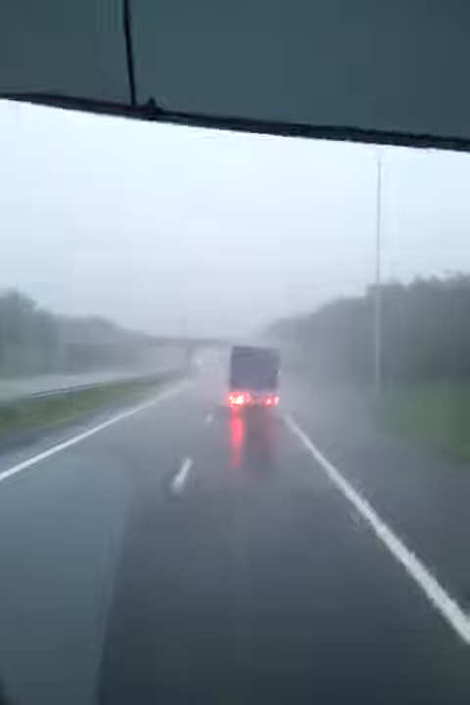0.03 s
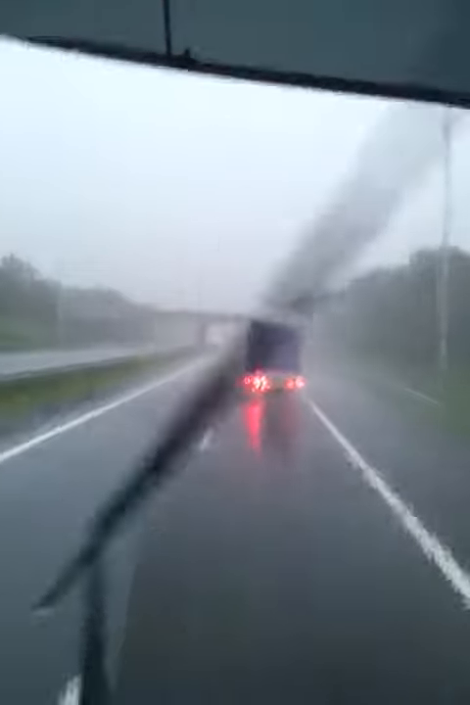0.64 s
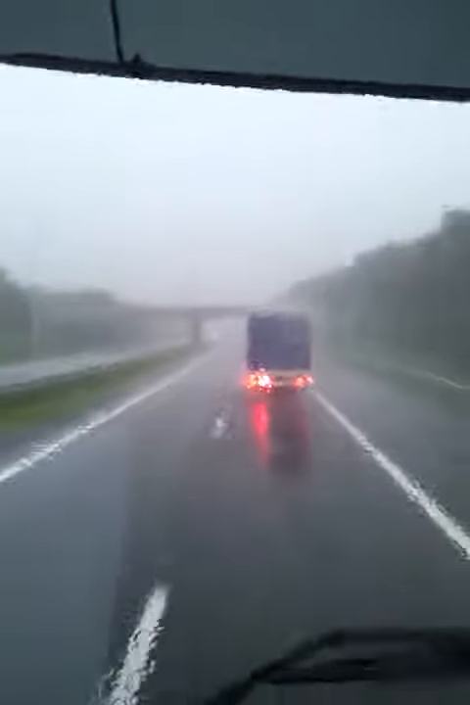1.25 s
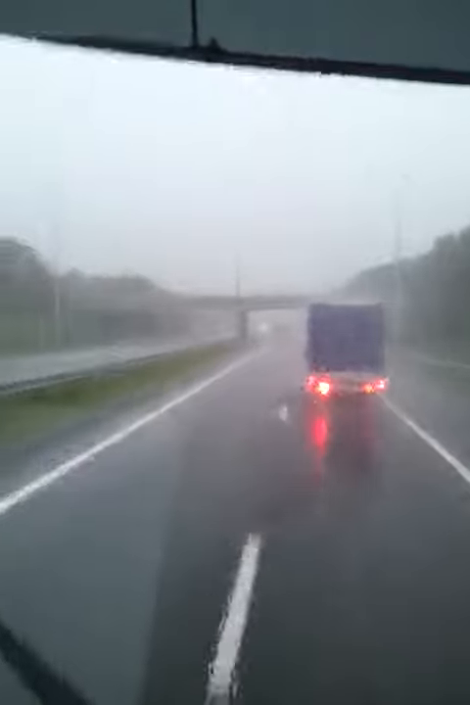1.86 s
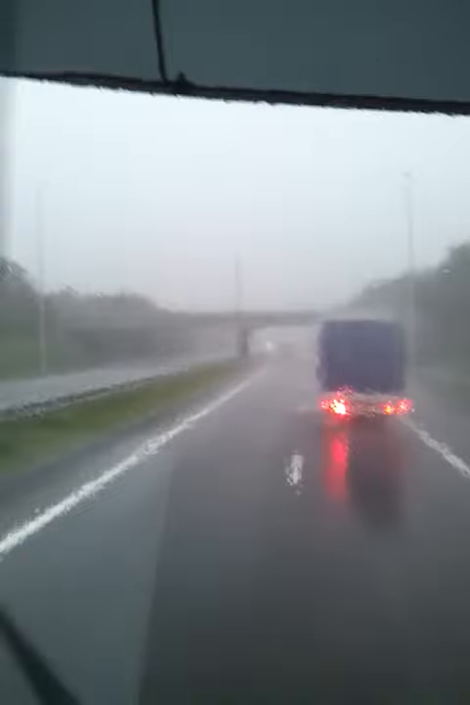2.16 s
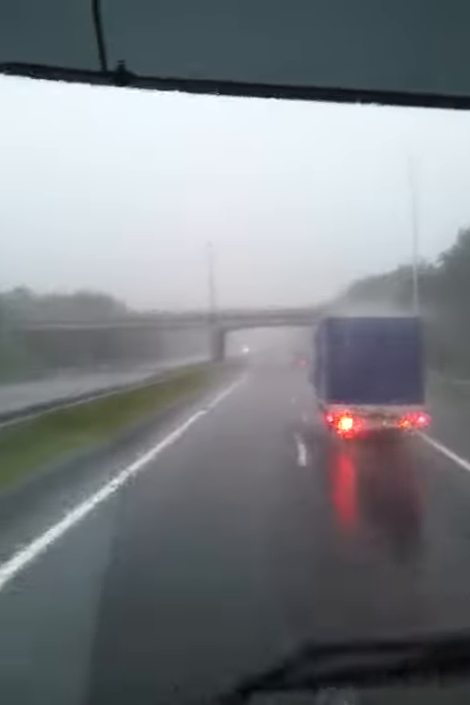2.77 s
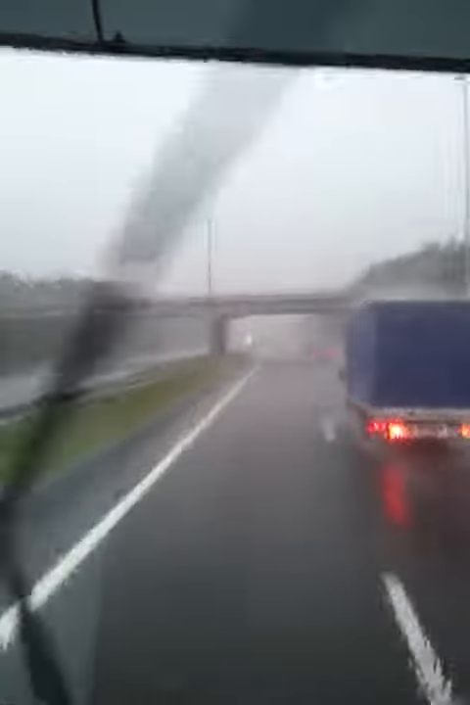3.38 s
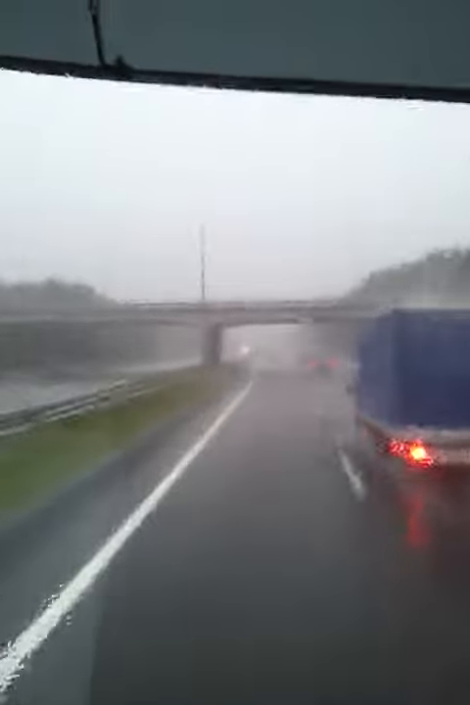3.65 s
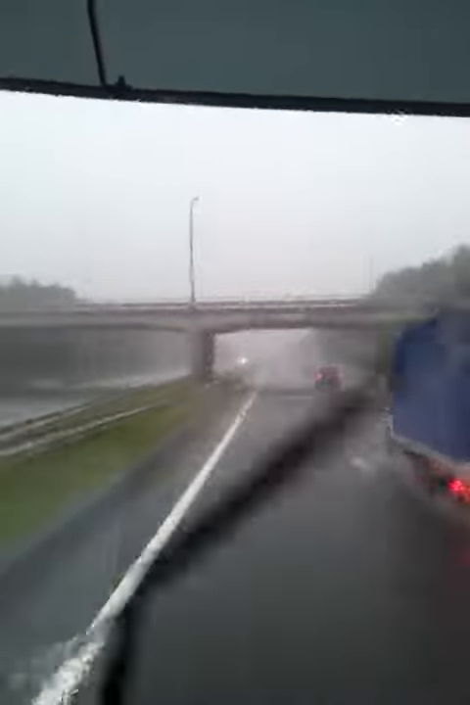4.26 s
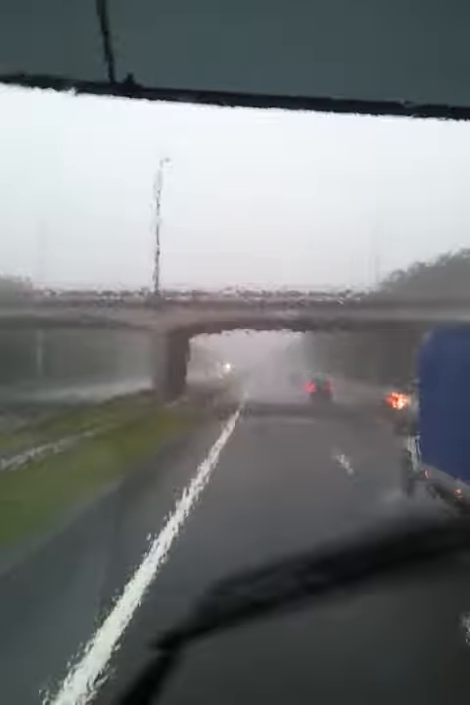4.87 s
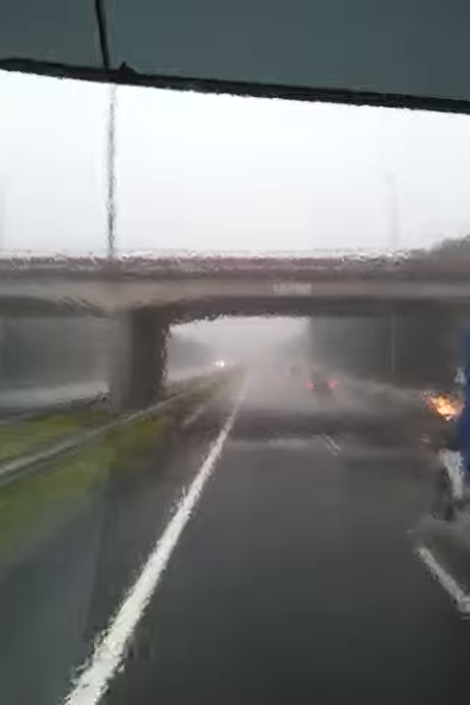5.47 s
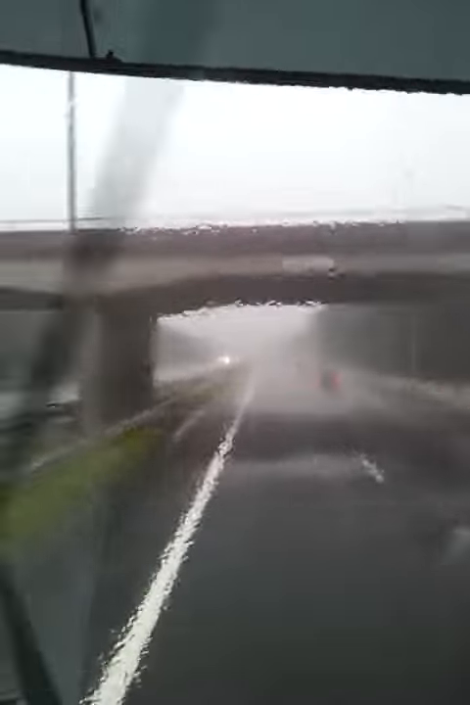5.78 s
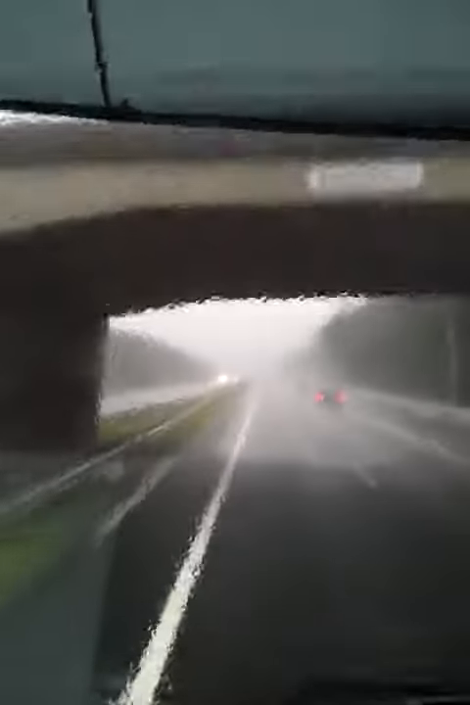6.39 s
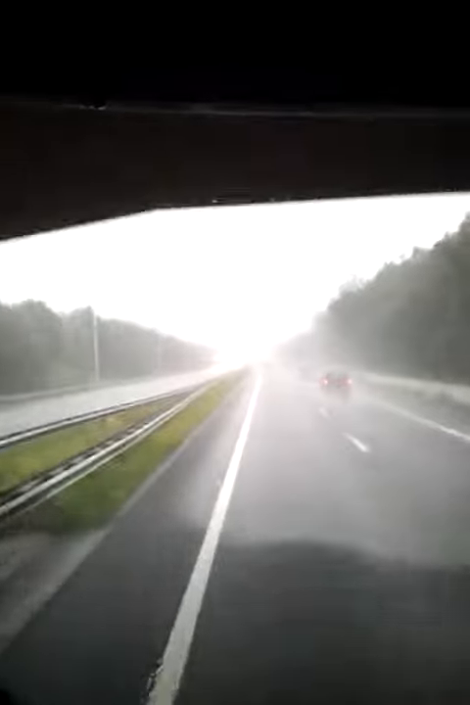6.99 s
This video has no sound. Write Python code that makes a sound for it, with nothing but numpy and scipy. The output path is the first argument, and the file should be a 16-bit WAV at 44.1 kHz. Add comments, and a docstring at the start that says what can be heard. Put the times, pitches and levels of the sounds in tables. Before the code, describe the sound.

Heard from inside a moving car, heavy rain drums and hisses on the windscreen and roof over tyre roar and low body rumble. A wiper rubs briefly on the glass, and the engine drones, then eases off. A lorry's low throb and tyre growl build as it is overtaken, while water slaps the windscreen now and then. At the end the rain cuts out under a bridge, leaving the road noise and the lorry.

```python
"""Motorway downpour from inside a car

Rain drums on the windscreen and roof, a dense train of random impacts, over tyre roar and body rumble.
The engine drones at multiples of its crank rate, then eases off, and the gears whine faintly. A lorry
throbs with each turn of its wheels as it is overtaken, and a wiper rubs on the glass and knocks once.
At the end a bridge shelters the windscreen, then the roof, and the drumming stops. One cabin microphone."""
import sys
import numpy as np
from scipy import signal
from scipy.fft import rfft, irfft, next_fast_len
from scipy.io import wavfile
from scipy.ndimage import map_coordinates

SR = 44100
rng = np.random.default_rng(int(sys.argv[2]) if len(sys.argv) > 2 else 0)


def int16_out(signal):
    """Quantize to a 16-bit WAV file."""
    q = np.round(np.clip(np.atleast_2d(signal).T, -1, 1) * 32767)
    wavfile.write(sys.argv[1], SR, q.astype(np.int16))


N = 310023

# resonances and dips of glass, roof and cabin air: (centre [Hz], width [Hz], gain [dB])
CABIN_RESONANCES = [(255, 26, 5), (264, 32, 0), (334, 25, 3), (416, 30, 4), (490, 22, 2.5), (531, 15, 4),
                    (820, 24, 0.5), (940, 31, -4), (1060, 74, 2), (1180, 50, -1.5), (1547, 90, -1.4),
                    (1800, 200, 0.5), (2380, 220, 0.7)]
# the microphone's treble roll-off: (frequency [Hz], gain [dB])
MIC_RESPONSE = [(6500, 0.5), (7100, -0.5), (7500, -5.5), (7900, -15), (8400, -16.5), (8800, -24.5),
                (9100, -34.5)]

# rumble of the body on the road: (time [s], relative level [dB])
RUMBLE_LEVEL = [(.8, -31), (1.05, -31.5), (1.85, -34), (2.85, -33.5), (3.55, -35), (4.9, -33), (5.8, -36),
                (6.5, -33.5)]
# spectrum of that rumble: (frequency [Hz], relative density [dB])
RUMBLE_SPECTRUM = [(8, -26.5), (20, -1.5), (33, 0), (50, -2.5), (75, 1), (115, 0), (150, 2.5), (185, -13.5),
                   (260, -32.5), (500, -47)]
# tyre roar on wet asphalt: (frequency [Hz], relative density [dB])
ROAR_SPECTRUM = [(100, -14.5), (170, -5), (250, -2), (380, -4), (500, -1), (650, -5), (1000, -10),
                 (1300, -17.5), (2500, -26), (5000, -34), (9000, -46.5)]
# tyres plough through standing water: (middle [s], length [s], level [dB])
PUDDLE_SWELLS = [(1.103, .35, -34), (2.246, 0.21, -32), (4.518, 0.23, -32.5), (5.176, 0.22, -27),
                 (6.2, 0.25, -31.5), (6.709, .15, -31.5)]
# its hollow rush in the wheel arches: (frequency [Hz], relative density [dB])
ARCH_SPECTRUM = [(150, -17), (330, -7), (480, 0.5), (600, -2), (800, -9), (1500, -18.5), (5000, -47.5)]

# the engine pulls, then eases off: (time [s], level [dB])
ENGINE_LEVEL = [(1.0, -33), (1.6, -28.5), (2.2, -25), (2.8, -29), (3.25, -25), (3.42, -36), (7.03, -41)]
# engine speed: (time [s], crank rate [turns/s])
CRANK_RATE = [(1.0, 49.7), (1.31, 49.1), (1.71, 47.1), (2.77, 46.0), (2.96, 46.0), (3.4, 47.5)]
# engine partials: (order [multiple of crank rate], relative level [dB])
ENGINE_PARTIALS = [(1, -8), (1.5, -7.5), (2, 0), (3, -3.5), (3.5, -5)]

# the lorry draws alongside: (time [s], relative level [dB])
LORRY_LEVEL = [(3.4, -60.5), (4.0, -40), (4.8, -33.5), (5.3, -26.5), (5.8, -25.5), (6.55, -26.5),
               (7.03, -25)]
# its wheels gather a little speed: (time [s], rate [turns/s])
LORRY_WHEEL_RATE = [(4.8, 9.33), (5.4, 9.44), (5.8, 9.59), (7.03, 9.77)]
# one throb, falling in pitch: (share of cycle [0-1], nominal pitch [Hz], relative level [dB])
THROB_SHAPE = [(0, 142, -15.5), (.15, 126, -5.5), (.35, 115, 1.5), (.55, 103, -6), (.75, 94, -3),
               (1, 84, -7)]
# growl of the lorry's tyres: (frequency [Hz], relative density [dB])
GROWL_SPECTRUM = [(50, -28), (85, -2.5), (125, 4), (165, -12.5), (192, 0), (220, -7.5), (255, -3),
                  (300, -14), (480, -6.5), (700, -23.5), (2000, -40)]

# wiper rubs on the glass: (time [s], t60 [s], starting pitch [Hz], level [dB])
WIPER_RUBS = [(1.095, 0.24, 630, -23), (1.3, 1.2, 550, -29.5)]
# dull ring of the wiper's knock: (frequency [Hz], relative level [dB])
WIPER_KNOCK_MODES = [(700, -4), (930, 4), (1080, -1)]
# water slaps the windscreen: (time [s], relative level [dB], t60 [s])
WINDSCREEN_SPLATS = [(1.104, -15, 0.082), (1.235, -12, 0.017), (1.476, -18, 0.028), (2.008, -25, 0.016),
                     (3.088, -19.5, 0.21), (4.022, -14, 0.02), (6.24, -14.5, 0.094), (6.281, -19, 0.29),
                     (6.595, -27, 0.32)]
# the bridge covers windscreen, then roof: (middle [s], time to cover [s], weight in the rain [dB])
SHELTERED_PANELS = [(6.79, 0.16, 2), (6.944, 0.037, -11.5)]
# how hard it rains on the car: (time [s], relative level [dB])
RAIN_LEVEL = [(1.55, -24), (1.85, -22.5), (2.38, -22), (2.48, -24), (2.9, -25.5), (3.02, -23), (3.3, -23.3),
              (3.95, -21), (4.85, -22), (5.2, -21.2), (5.6, -23), (6.05, -19.5), (6.45, -22), (6.6, -19.5)]
# the rain's sound briefly drops out at 0.924 s, just after the microphone starts;
# the other rows are denser sheets and lulls: (middle [s], length [s], level change [dB])
RAIN_SWELLS_AND_DIPS = [(0.82, 0.045, 1.5), (0.924, 0.06, -10), (0.98, 0.031, 1), (1.196, 0.14, 4),
                        (1.41, 0.1, -4.5), (1.657, 0.044, -2.5), (2.473, 0.064, -3), (2.92, 0.045, -1.5),
                        (3.11, .08, 2.9), (3.552, 0.11, -1.5), (3.738, 0.063, 1.5), (3.852, .05, -1.8),
                        (5.373, 0.043, 1.1), (6.252, 0.12, 2.5), (6.382, .06, -1.5), (6.6, 0.052, 0.5)]
# drumming of big drops: (frequency [Hz], relative density [dB])
DROP_SPECTRUM = [(60, -33.5), (200, -6), (500, -1.5), (800, 0.5), (1300, -0.5), (1800, -0.5), (2600, -1.5),
                 (4000, -5), (6000, -9.5), (8000, -36)]
# hiss of fine spray: (frequency [Hz], relative density [dB])
SPRAY_SPECTRUM = [(500, -35), (1500, -12), (3000, -4), (4100, -2), (4800, -3.5), (5800, -1.5), (7000, -4.5),
                  (9000, -9.5)]


def amp(db):
    """Amplitude grows tenfold for every 20 dB."""
    return 10 ** (np.asarray(db) / 20)


def unit(x):
    """Normalisation to an rms of 1."""
    return x / np.sqrt(np.mean(x ** 2) + 1e-20)


def curve(points):
    """Linear interpolation of (time, value) points at every sample."""
    times, values = np.transpose(points)
    return np.interp(np.arange(N) / SR, times, values)


def wobble(rate):
    """Smooth random modulation: a spline through `rate` Gaussian values a second."""
    knots = rng.standard_normal(int(N * rate / SR) + 4)
    return map_coordinates(knots, [np.arange(N) * rate / SR])


def swell(middle, length):
    """A bell-shaped envelope of height 1; length is its width at half height."""
    return np.exp2(-np.abs(2 * (np.arange(N) / SR - middle) / length) ** 3)


def along(points, hz):
    """Interpolation of (frequency, value) points on a logarithmic frequency axis."""
    frequencies, values = np.transpose(points)
    return np.interp(np.log(hz + 1), np.log(frequencies + 1), values)


def filtered(x, gain_db):
    """Minimum-phase filtering: folding the cepstrum makes the response gain_db(hz) causal."""
    size = 2 * next_fast_len((N + SR) // 2)
    hz = np.fft.rfftfreq(size, 1 / SR)
    cepstrum = irfft(np.log(amp(gain_db(hz))), size)
    cepstrum[1:size // 2] *= 2
    cepstrum[size // 2 + 1:] = 0
    return irfft(rfft(x, size) * np.exp(rfft(cepstrum)), size)[:N]


def coloured(x, spectrum):
    """Spectral shaping: a white excitation takes on the filter's spectrum, at rms 1."""
    return unit(filtered(x, lambda hz: along(spectrum, hz)))


def noise(spectrum):
    """Gaussian noise shaped to a spectrum, at rms 1."""
    return coloured(rng.standard_normal(N), spectrum)


def tone(pitch, level_db, jitter, flutter_db, rate):
    """A sinusoid under random frequency and amplitude modulation."""
    phase = 2 * np.pi * np.cumsum(pitch * (1 + jitter * wobble(rate))) / SR
    return amp(level_db + flutter_db * wobble(rate)) * unit(np.sin(phase))


def impacts(per_second, spread_db, wash):
    """Shot noise: randomly timed drops of scattered size over a Gaussian wash of tiny ones."""
    lands = rng.random(N) < per_second / SR
    size = amp(spread_db * np.clip(rng.standard_normal(N), -2, 2))
    polarity = rng.choice([-1, 1], N)
    return unit(unit(lands * size * polarity) + wash * rng.standard_normal(N))


def cabin(x):
    """Resonance: panels and enclosed air lift some bands and swallow others."""
    def gain_db(hz):
        return sum(db / (1 + (2 * (hz - centre) / width) ** 2) for centre, width, db in CABIN_RESONANCES)
    return filtered(x, gain_db)


def gear_whine():
    """Periodic meshing of gear teeth radiates one faint tone, which slowly fades."""
    start_db, fade_db_per_s = -38, 1.8
    level_db = start_db - fade_db_per_s * np.arange(N) / SR
    return tone(pitch=815, level_db=level_db, jitter=0.0082, flutter_db=2.5, rate=25)


def road():
    """Rolling contact makes broadband noise: the body rumbles, tyres roar, water rushes in the arches."""
    rumble = amp(curve(RUMBLE_LEVEL) + 4.0 + 0.49 * wobble(12)) * noise(RUMBLE_SPECTRUM)
    roar = amp(-30.5 + 0.34 * wobble(15)) * noise(ROAR_SPECTRUM)
    puddles = sum(amp(db) * swell(middle, length) for middle, length, db in PUDDLE_SWELLS)
    return rumble + roar + puddles * noise(ARCH_SPECTRUM)


def engine():
    """Rotational orders: partials locked to the crank rate, each wavering a little in strength."""
    rate = curve(CRANK_RATE) * (1 + 0.0021 * wobble(4.23))
    crank_angle = 2 * np.pi * np.cumsum(rate) / SR
    partials = sum(amp(db + 0.56 * wobble(4)) * np.sin(order * crank_angle + rng.uniform(0, 2 * np.pi))
                   for order, db in ENGINE_PARTIALS)
    return amp(curve(ENGINE_LEVEL)) * unit(partials)


def lorry():
    """Periodic excitation: a low boom repeats with each wheel turn, over the growl of heavy tyres."""
    nominal_cycle_s, cycle_start_s = .1036, 5.895
    cycle = np.arange(round(nominal_cycle_s * SR)) / (nominal_cycle_s * SR)
    share, pitch, throb_db = np.transpose(THROB_SHAPE)
    phase = 2 * np.pi * np.cumsum(np.interp(cycle, share, pitch)) / SR
    envelope = amp(np.interp(cycle, share, throb_db)) * signal.windows.tukey(len(cycle), .1)
    turns = np.cumsum(curve(LORRY_WHEEL_RATE)) / SR
    wheel_position = (turns - turns[round(cycle_start_s * SR)]) % 1
    throbs = np.interp(wheel_position, cycle, envelope * np.sin(phase))  # one throb fills each turn
    growl = amp(-3) * noise(GROWL_SPECTRUM)
    boom = amp(-1.5 + 0.95 * wobble(7.4)) * unit(throbs)
    return amp(curve(LORRY_LEVEL)) * (boom + growl)


def wiper():
    """Friction: rubber slips on wet glass with a rough tone that sinks and fades as the blade slows."""
    attack_s, sag_s, end_hz = 0.011, .08, 405
    out = np.zeros(N)
    for start, t60, start_hz, db in WIPER_RUBS:
        age = np.maximum(np.arange(N) / SR - start, 0)
        pitch = end_hz + (start_hz - end_hz) * np.exp(-age / sag_s)
        rub = tone(pitch, db - 60 * age / t60, jitter=.06, flutter_db=3, rate=160)
        out += np.minimum(1, age / attack_s) * rub
    return out


def wiper_knock():
    """Damped free vibration: one soft, short knock as the wiper turns round."""
    start_s, gain_db, t60_s = 2.733, -23, .035
    age = np.maximum(np.arange(N) / SR - start_s, 0)
    ring = sum(amp(db) * np.sin(2 * np.pi * hz * age) for hz, db in WIPER_KNOCK_MODES)
    return amp(gain_db - 60 * age / t60_s) * ring


def splats():
    """Liquid impact: each gush slaps the glass and scatters in an exponentially decaying noise burst."""
    envelope = np.zeros(N)
    age = np.arange(SR // 5) / SR
    for start, db, t60 in WINDSCREEN_SPLATS:
        rise = 1 - np.exp(-age / (0.042 * t60))  # a long gush also spreads more slowly
        envelope[round(start * SR):][:len(age)] += rise * amp(db - 60 * age / t60)
    return amp(1.5) * envelope * noise(DROP_SPECTRUM)


def bridge_shelter():
    """Incoherent sources add in power: the rain's gain falls as the bridge covers each panel."""
    residual_db = -31.5  # rain still heard under the bridge
    t = np.arange(N) / SR
    exposed_power = sum((amp(db) * np.clip(.5 - (t - middle) / cover_s, 0, 1)) ** 2
                        for middle, cover_s, db in SHELTERED_PANELS)
    return np.sqrt(exposed_power / exposed_power[0] + amp(residual_db) ** 2)


def rain():
    """Superposed impacts: big drops drum, fine spray hisses; louder rain favours the big drops."""
    ordinary_rain_db = -23
    change_db = sum(db * swell(middle, length) for middle, length, db in RAIN_SWELLS_AND_DIPS)
    level_db = curve(RAIN_LEVEL) + change_db
    spray_bias = -4 - 0.21 * (level_db - ordinary_rain_db) + 0.39 * wobble(7)
    envelope = bridge_shelter() * amp(level_db + 0.6 * wobble(28))
    drops = coloured(impacts(per_second=4500, spread_db=2.5, wash=0.62), DROP_SPECTRUM)
    spray = coloured(impacts(per_second=6500, spread_db=6.5, wash=0.79), SPRAY_SPECTRUM)
    return envelope * (amp(-4 - .5 * spray_bias) * drops + amp(3.0 + 1.27 * spray_bias) * spray)


def scene():
    """Superposition at one point in the cabin, whose resonances colour the water and road noise."""
    water_and_road = cabin(rain() + splats() + road())
    inside = water_and_road + engine() + gear_whine() + lorry() + wiper() + wiper_knock()
    return np.array([inside, inside])


def record(dry):
    """Band limiting: a mono microphone with a dull treble, switched on after a moment and fading in."""
    switch_on_s, fade_from_db, fade_s, cutoff_hz = .741, -18, 0.087, 9087
    age = np.maximum(np.arange(N) / SR - switch_on_s, 0)
    fade_in = (age > 0) * amp(fade_from_db * np.exp(-age / fade_s))
    size = next_fast_len(N + SR // 2)
    hz = np.fft.rfftfreq(size, 1 / SR)
    response = amp(along(MIC_RESPONSE, hz)) * (hz < cutoff_hz)
    return irfft(rfft(dry * fade_in, size) * response, size)[:, :N]


dry = scene()
out = record(dry)
int16_out(out)
```